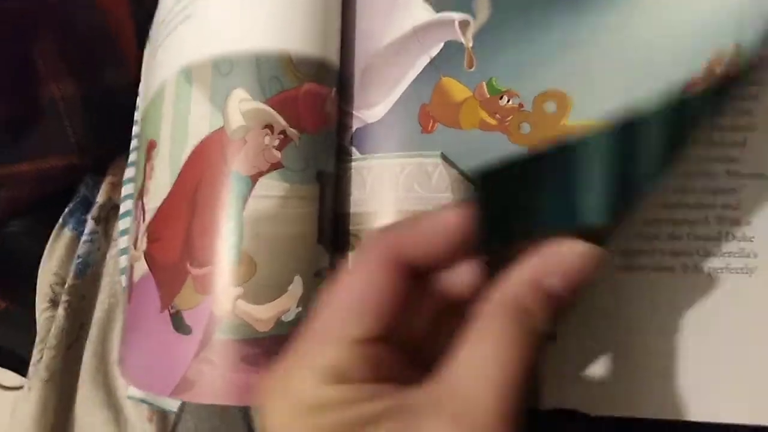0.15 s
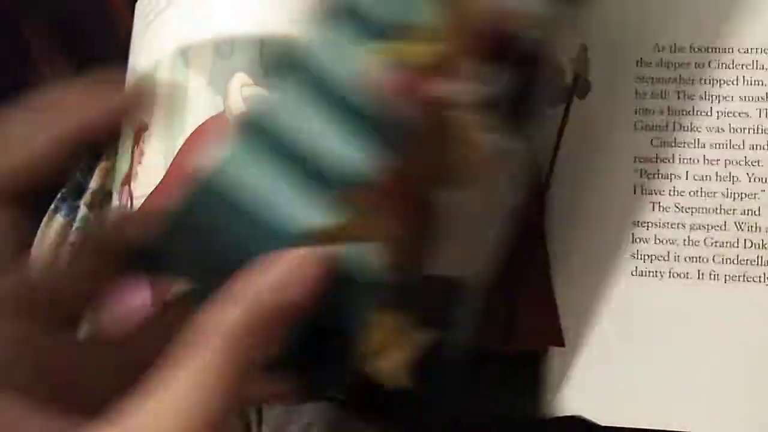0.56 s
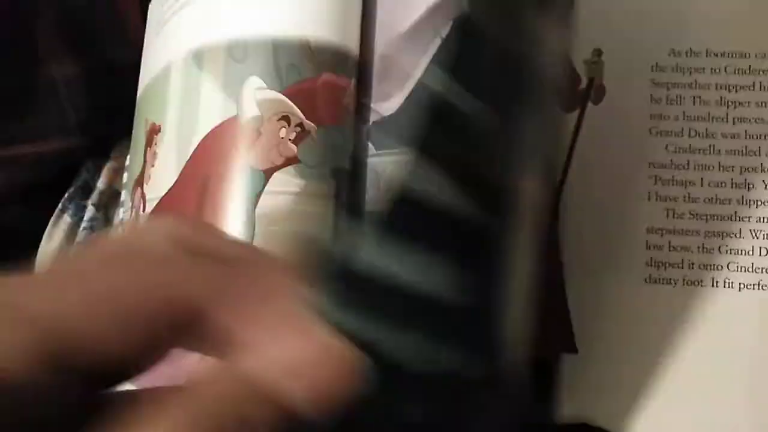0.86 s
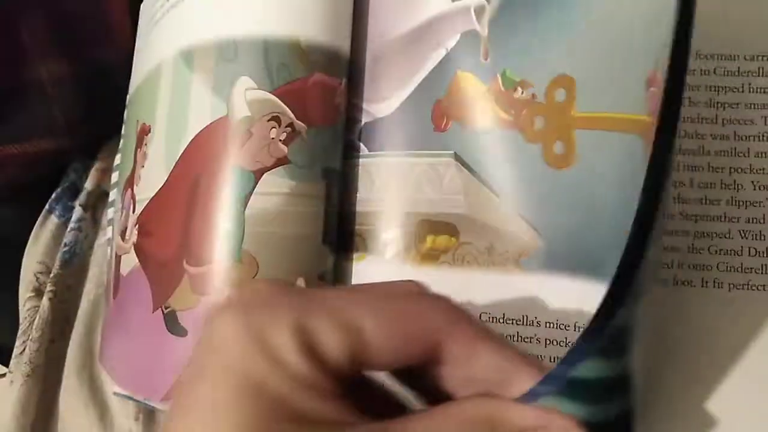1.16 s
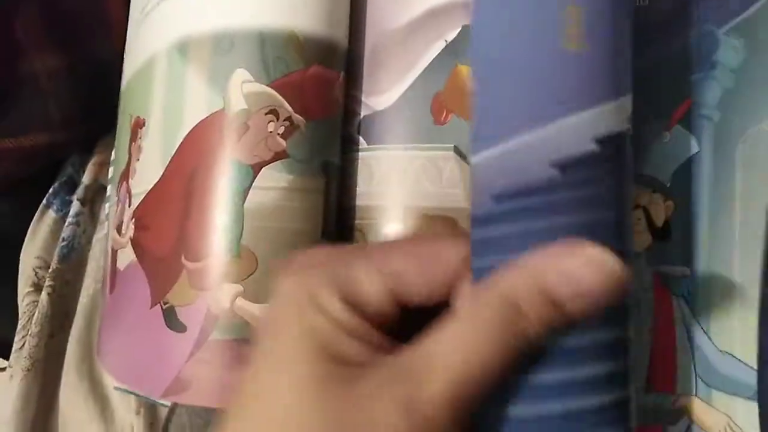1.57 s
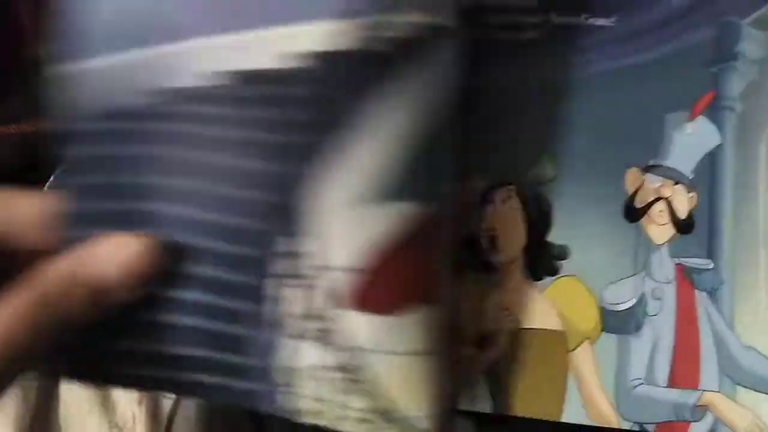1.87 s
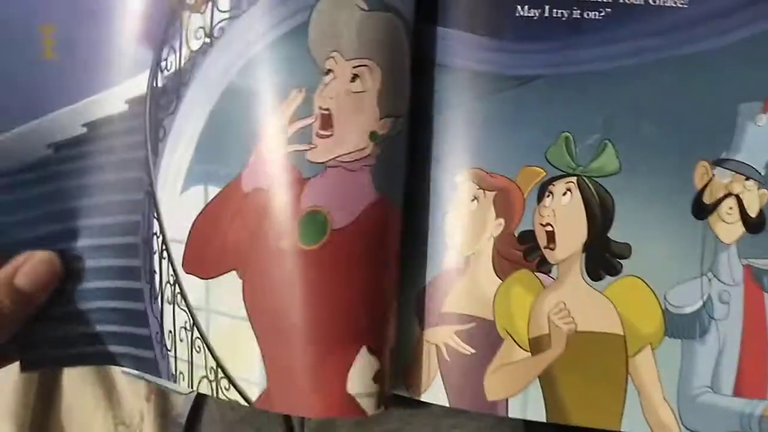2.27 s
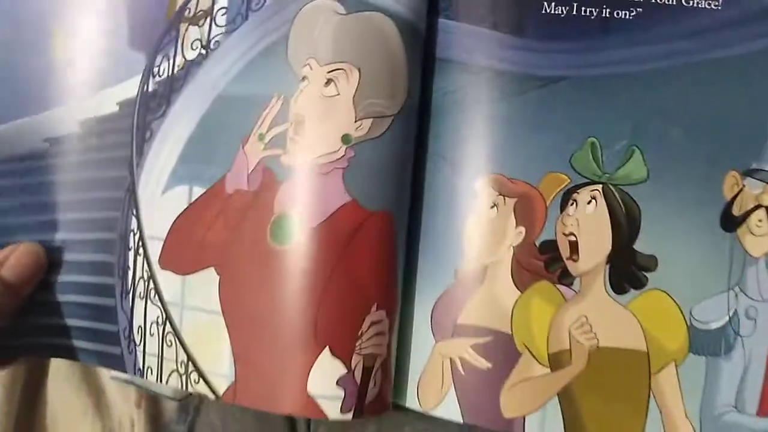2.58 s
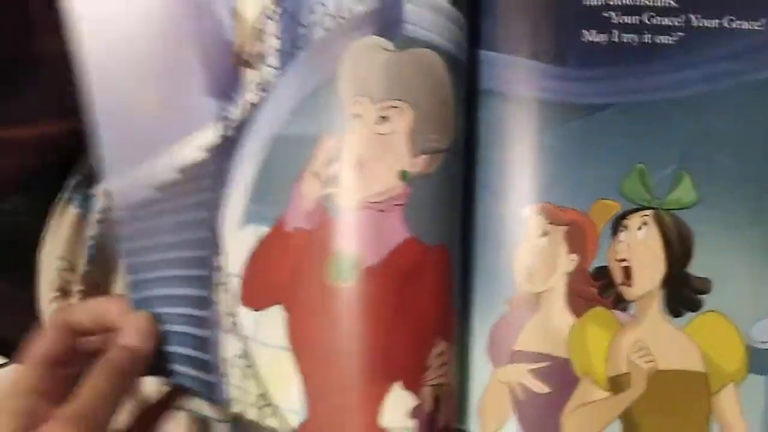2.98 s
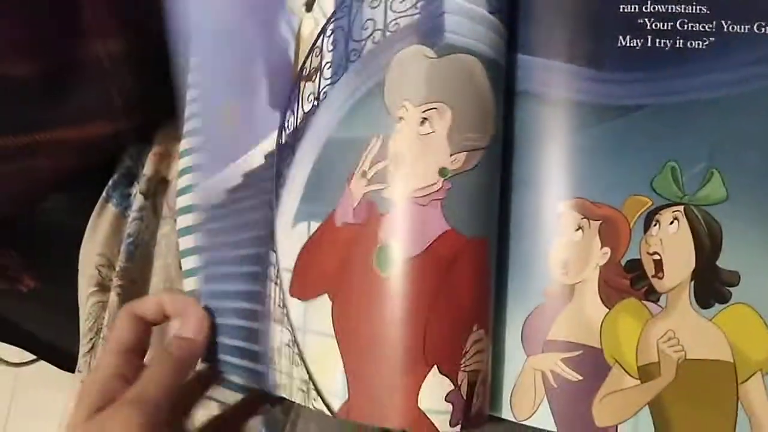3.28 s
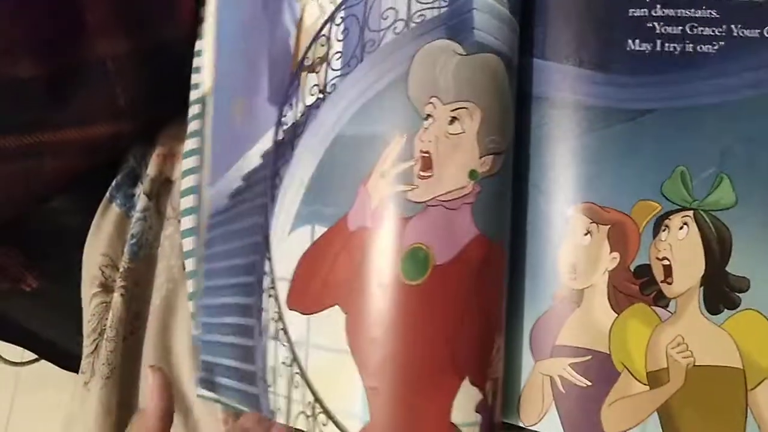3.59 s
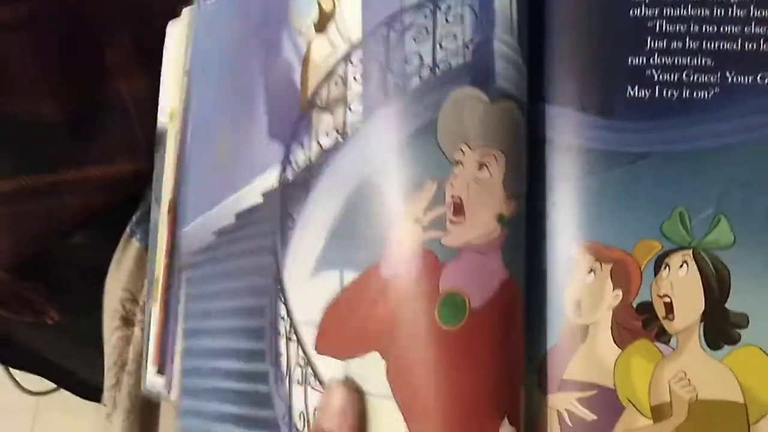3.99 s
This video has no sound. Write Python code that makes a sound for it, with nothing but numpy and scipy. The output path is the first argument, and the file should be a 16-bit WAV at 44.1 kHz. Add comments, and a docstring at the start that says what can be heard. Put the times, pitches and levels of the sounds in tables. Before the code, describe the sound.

Close, bright paper rustling as a hand turns slick book pages in a quiet room, with tiny crackles and low handling thumps.

```python
"""A bright hiss comes first: fingers stroke the glossy pages of a picture book, close to a phone in a quiet room.
Skin slides over the coating in tiny slips, with a scuff and the duller rustle of the sheet beneath the hiss.
The air pocket between the pages rings hollow, the bending page wobbles low and the paper snaps now and then.
Behind this the hand that holds the phone rumbles through its case, over a faint room.
All of it is shaped noise, heard by the phone's two microphone ports."""
import sys
import numpy as np
from scipy import signal
from scipy.fft import rfft, irfft
from scipy.io import wavfile
from scipy.ndimage import uniform_filter1d, map_coordinates

SR = 44100
rng = np.random.default_rng(int(sys.argv[2]) if len(sys.argv) > 2 else 0)


def int16_out(signal):
    """Quantize to a 16-bit WAV file."""
    q = np.round(np.clip(np.atleast_2d(signal).T, -1, 1) * 32767)
    wavfile.write(sys.argv[1], SR, q.astype(np.int16))


N = 181912
T = np.arange(N) / SR
CONTROL_T = T[::64]  # slower clock for the level curves

# Strokes of skin over the gloss: peak t/s, rise t/s, hold t/s, fall t/s, hiss level/dB,
# then over the hiss: sheet level/dB, top treble level/dB, hollow level/dB
STROKES = [ (0.0, .03, 0.0021, 0.2, -39.5, -9.5, -6, -10),
           (0.151, 0.37, 0.0049, 0.17, -48, -1.5, -11, -4.5), (.2, .06, 0.041, 0.16, -56.5, 4.5, -4, 3.7),
           (.331, 0.014, 0.038, 0.081, -41.5, -5, -13, -6.5),
           (0.366, 0.034, 0.011, 0.087, -25.5, -11, -7.5, -10.5),
           (0.46, 0.041, 0.047, 0.27, -38, -8, -4.5, -10), (0.586, 0.23, 0.15, 0.2, -48, -7, -6, -6),
           (0.748, 0.06, 0, 0.22, -33.5, -6, -4.5, -11), (0.904, 0.084, 0, 0.27, -42, -2, -6, -1.5),
           (0.956, 0.11, 0.0094, 0.047, -36.5, -14, -6.5, -9), (1.036, .15, 0.016, 0.036, -48, -0.5, -4, 0),
           (1.075, 0.062, 0.08, 0.018, -60.5, 5, -16, 8.5),
           (1.153, 0.047, 0.049, 0.16, -43.5, -11.5, -5, -9),
           (1.267, 0.086, 0.0078, 0.098, -38.5, -6.5, -5.5, -13),
           (1.395, 0.12, 0.0033, 0.23, -27.5, -5.5, -6, -12.5),
           (1.472, 0.074, 0.013, 0.13, -23.5, -8.5, -6, -14.5),
           (1.612, 0.1, 0.099, 0.39, -32, -10, -10, -8.5), (1.972, 0.21, 0, 0.065, -37.5, -11.5, -11, -5),
           (2.035, 0.16, 0.027, 0.049, -35, -11, -2.5, -5), (2.11, 0.036, 0.025, 0.18, -39, -2, -12, 0.5),
           (2.15, .11, 0.13, 0.12, -41.5, -7, -4, -32), (2.297, 0.049, 0.0051, 0.092, -35.5, -12, -11, -15),
           (2.36, 0.17, 0.13, 0.26, -48.5, -5, -18, -9.5), (2.488, 0.16, 0, 0.36, -37, -12, -4.5, -20),
           (2.63, 0.33, 0.094, .05, -55.5, 1, -13, -20), (2.702, 0.042, 0.025, 0.14, -42, -5.5, -6, -7),
           (2.79, 0.12, 0.065, 0.02, -52.5, -8, -3, -27), (2.908, 0.0078, 0.048, 0.046, -48.5, -8, 1, -19),
           (2.926, 0.019, .04, 0.051, -43, -8, -4.5, -23),
           (3.051, .007, 0.014, 0.068, -59.5, -8.5, -4, -26),
           (3.112, 0.0074, 0.0038, 0.13, -53, -20.5, -10, -21.5),
           (3.138, 0.066, 0.092, 0.021, -61, -33, -4, -24),
           (3.304, 0.033, .042, 0.032, -49.5, -9.5, -5.5, -19), (3.399, 0.12, 0, 0.12, -71, -7, -1.5, -5),
           (3.562, 0.059, 0.16, 0.046, -80.5, -31, 8, -12.5),
           (3.616, 0.11, 0.017, 0.062, -67.5, -43, 5, -38),
           (3.658, .025, 0.0028, 0.065, -58, -35.5, -6, -28),
           (3.735, .011, 0.044, 0.13, -48.5, -19, -10, -22), (3.785, 0.039, 0.052, 0.047, -44.5, -3, -8, 0),
           (3.859, 0.048, 0, 0.08, -35, -13, -6, -13.5), (3.91, 0.061, 0.025, 0.05, -57, -6, -12, 1),
           (4.02, 0.038, 0.048, 0.019, -57, -19, -9, -35), (4.056, .016, 0.034, 0.17, -42.5, -25, -16, -27)]
# Colours of the four rubbing layers, each: f/Hz, relative level/dB per Hz
HISS_COLOUR = [(3060, -38), (5200, -7), (6250, 1), (7360, -2.5), (8010, -4), (9040, -7.5), (10000, -11),
               (13000, -38.5), (22000, -120)]
SHEET_COLOUR = [(740, -48.5), (1250, -8), (1530, -6.5), (1960, 1), (2150, -6), (2490, -0.5), (3300, -13.5),
                (4290, -38.5), (7260, -120)]
TOP_COLOUR = [(5000, -42.5), (8500, 1.5), (9220, 3), (12300, -4), (14300, -15), (14800, -26.5)]
SCUFF_COLOUR = [(1820, -42), (3100, -2), (3420, -4.5), (3880, -1.5), (4630, -1.5), (5600, -4.5),
                (7280, -32.5), (12300, -120)]
# Scuff over the hiss as the grip changes, before the sheet's share: t/s, level/dB
SCUFF_LEVEL = [(0, 0), (.34, 1), (.45, -1), (.85, -2.5), (1.15, 2.5), (1.22, -3), (1.45, -1), (1.6, 0),
               (1.95, -5.5), (2.15, 1), (2.4, -2.5), (2.7, -1.5), (3.05, -2), (3.15, 2), (3.35, -3.5),
               (3.75, 2), (3.87, -0.5), (4.12, 2)]
# Sound that both microphone ports hear alike: f/Hz, share of power
HEARD_ALIKE = [(60, 0.83), (300, 0.23), (1000, 0.58), (3000, 0.51), (7000, 0.21), (14000, 0.15)]
# The hand moves across the phone: t/s, delay of the left port/ms, left-right level/dB
HAND = [(0, 0.041, 5), (.3, 0.11, 5), (.6, 0.25, 2), (1.0, 0.25, 3.5), (1.2, 0.045, 5.5), (1.5, 0.064, 3.5),
        (1.7, 0.1, 2), (1.9, 0.25, 1), (2.098, 0.29, 1.8), (2.32, 0.3, 1), (2.451, 0.27, 1),
        (2.95, 0.32, -1), (3.1, 0.28, -2.5), (3.35, .29, 1), (3.58, 0.16, -9), (3.7, 0.03, 0.5),
        (4.12, 0.14, 2)]
# share of the fall that each layer follows
SHEET_FOLLOWS, SCUFF_FOLLOWS, TOP_FOLLOWS, HOLLOW_FOLLOWS = 0.92, 0.9, 1, 0.65
SCUFF_WITH_SHEET = 0.54  # share of the sheet's dB that the scuff takes on


def sliding(patchy_db=1.3, flicker_db=1.2, side_db=1.5):
    """Slips excite coating and sheet; the contact patch keeps changing, so the colour drifts."""
    frames = dict(nperseg=256, noverlap=192)
    hz, t, (common, own_left, own_right) = signal.stft(ringing(slips(), 4.35), SR, **frames)
    *shape, hiss_db, sheet_db, top_db, _ = columns(STROKES)
    scuff_db = np.interp(t, *np.transpose(SCUFF_LEVEL)) + SCUFF_WITH_SHEET * sheet_db
    layers = [(HISS_COLOUR, 0, 1), (SHEET_COLOUR, sheet_db, SHEET_FOLLOWS),
              (TOP_COLOUR, top_db, TOP_FOLLOWS), (SCUFF_COLOUR, scuff_db, SCUFF_FOLLOWS)]
    power = 0
    for colour, over_hiss_db, follows in layers:
        spectrum = evened(gain_of(read(colour, hz)))
        level = summed(hiss_db + over_hiss_db + swells(t, *shape, follows))
        power = power + np.outer(spectrum, level) ** 2
    patches = patchy_db * drifting(power.shape, 2, 23)
    flicker = flicker_db * drifting((1, len(t)), 1, 3.2)
    # each port also hears its own reflections off the hand and the page
    alike = np.clip(read(HEARD_ALIKE, hz), 0, 1)[:, None]
    left = np.sqrt(alike) * common + np.sqrt(1 - alike) * own_left
    right = np.sqrt(alike) * common + np.sqrt(1 - alike) * own_right
    s, _, pan_db = np.transpose(HAND)
    lean_db = np.interp(t, s, pan_db) + side_db * drifting(power.shape, 6.5, 40)
    ports = np.array([left * gain_of(lean_db / 2), right / gain_of(lean_db / 2)])
    ports = ports * np.sqrt(power) * gain_of(patches + flicker)
    return signal.istft(ports, SR, **frames)[1][:, :N]


def slips(per_s=1500, spread_db=-1.5, share=0.21):
    """The force of skin on gloss: dense noise with sharper slips of uneven size."""
    happens = rng.random(N) < per_s / SR
    sizes = gain_of(spread_db * np.minimum(rng.exponential(1, N), 3.2)) * happens
    grains = signal.lfilter([1], [1, -.85], sizes)  # each slip dies away within samples
    force = 1 - share + share * evened(grains)
    return force * rng.standard_normal((3, N))


# The pocket closes and rings purer once the page lies down: t/s, pitch f/Hz,
# width f/Hz (sets the blend of the open and the shut resonance)
POCKET = [(0, 940, 724), (.15, 1100, 766), (.3, 870, 696), (.37, 1215, 757), (.57, 960, 690),
          (.74, 1150, 756), (.82, 970, 770), (1.2, 1110, 775), (1.29, 1260, 735), (1.55, 1120, 685),
          (2.35, 1107, 724), (2.66, 1215, 574), (2.8, 1133, 523), (3.15, 1116, 430), (3.28, 706, 420),
          (3.42, 906, 401), (3.75, 926, 376), (4.02, 1020, 380), (4.06, 1220, 380)]


def hollow(open_hz=800, shut_hz=330):
    """The air pocket between the pages rings under each stroke; a wide and a narrow resonance blend."""
    *shape, hiss_db, _, _, hollow_db = columns(STROKES)
    level = summed(hiss_db + hollow_db + swells(CONTROL_T, *shape, HOLLOW_FOLLOWS))
    s, pitch_hz, width_hz = np.transpose(POCKET)
    air = ringing(pair(0.34), 4.5)
    pitch = np.interp(T, s, pitch_hz)
    shut = np.clip((open_hz - np.interp(T, s, width_hz)) / (open_hz - shut_hz), 0, 1)
    narrow = np.sqrt(shut) * resonate(air, pitch, shut_hz)
    wide = (1 - np.sqrt(shut)) * resonate(air, pitch, open_hz)
    return (narrow + wide) * np.interp(T, CONTROL_T, level)


# The page wobbles as it bends: peak t/s, rise t/s, hold t/s, fall t/s, level/dB, pitch f/Hz
WOBBLES = [(.034, 0.13, 0.032, 0.081, -60.5, 552), (.17, 0.25, 0.0031, 0.058, -65, 436),
           (.352, 0.049, 0.031, .075, -77, 478), (.758, 0.015, 0, 0.0077, -41, 440),
           (.9, .03, 0, 0.025, -62, 514), (.926, 0.024, 0.021, .11, -53.5, 305),
           (1.0, 0.037, 0.092, .14, -63, 508), (1.28, 0.079, 0.19, 0.046, -60, 550),
           (1.494, 0.021, 0.0053, 0.095, -51, 300), (1.882, .03, 0, .12, -78, 503),
           (2.01, 0.017, 0.086, .05, -51.5, 315), (2.04, .02, 0, .03, -56.5, 520),
           (2.116, .012, 0.01, .05, -45.5, 285), (2.15, 0.035, 0.01, 0.056, -53, 380),
           (2.19, .11, 0.097, .055, -63.5, 320), (2.628, .021, 0.0085, 0.011, -61, 312),
           (2.69, 0.0095, 0.012, 0.091, -52, 340), (2.79, 0.076, 0.054, .055, -78, 310),
           (2.986, 0.11, 0, .025, -74.5, 486), (3.112, .013, 0.031, 0.044, -76, 479),
           (3.216, .025, 0.063, .03, -80, 500), (3.8, 0.055, 0.047, .11, -58.5, 403)]


def bending(width_hz=160):
    """The page wobbles as it bends; the pitch is a mean that leans to the loudest wobble."""
    *shape, db, hz = columns(WOBBLES)
    power = gain_of(db + swells(CONTROL_T, *shape)) ** 2
    total = power.sum(0)
    pitch = np.interp(T, CONTROL_T, (power * hz).sum(0) / total)
    wobble = resonate(ringing(pair(0.17), 3.9), pitch, width_hz)
    return wobble * np.interp(T, CONTROL_T, np.sqrt(total))


# Snaps of the paper: onset t/s, level/dB, ring over the bright part level/dB, ring f/Hz,
# rise t/ms, 60 dB decay t/ms, left-right level/dB
SNAPS = [(1.0408, -44, -5, 1780, 0.079, 7.4, 16), (1.0797, -29, -23, 2410, 0.05, 6.6, 7.5),
         (1.0985, -44.5, -5, 2570, 0.082, 9.6, 26), (1.1112, -27, -6, 2770, 0.12, 10.5, 5),
         (1.1352, -29, -20, 1470, 0.11, 13, 3), (1.4638, -23, 6.5, 7300, 5.7, 7, 8),
         (2.1105, -42, 15, 1730, 0.79, 5.7, -1), (2.6897, -50.5, 14, 1229, 0.15, 9.1, -19),
         (2.6945, -46, 15.5, 2600, 0.84, 23, -1), (2.6955, -56, 8.5, 1480, 1.5, 23, -29),
         (3.181, -68, -14, 2500, 1.2, 20, 0), (3.2195, -72, -27, 2530, 1.3, 12, 3.5),
         (3.3445, -65, -12, 2200, .3, 18, -2), (4.0062, -49.5, 4, 6700, 0.074, 15, -3),
         (4.009, -68.5, 1, 6300, 2.7, 73, -23)]
# Colour of a snap's bright part: f/Hz, relative level/dB per Hz
CRACK_COLOUR = [(410, -35.5), (700, -6), (5130, -2), (5970, -6.5), (6950, -4.5), (7990, -8), (10000, -4.5),
                (13600, -17.5), (14500, -24.5)]


def snaps(tail_db=-24, tail_ms=70, echo_db=-7, echo_ms=2.3, tick_db=13, breadth=0.87):
    """A fold gives way: a burst rings coating and sheet, swells again off a near surface, dies in the room."""
    size = 8192  # samples per snap
    out, t = np.zeros((2, N + size)), np.arange(size) / SR * 1000
    for s, db, ring_db, hz, rise_ms, t60_ms, pan_db in SNAPS:
        rise = np.sin(np.pi / 2 * np.clip(t / max(rise_ms, .05), 0, 1)) ** 2
        after = np.maximum(t - rise_ms, 0)
        direct = rise * gain_of(-60 * after / max(t60_ms, 1))
        echo = gain_of(echo_db) * np.interp(t - echo_ms, t, direct)  # repeats the envelope
        tail = rise * gain_of(tail_db - 60 * after / tail_ms)
        shape = direct + echo + tail
        # one sharp tick near the start, weaker when the snap rises slowly
        tick = gain_of(tick_db - 10 * rise_ms) * (np.arange(size) == 8)
        burst = pair(0.42, size) + tick
        bright = coloured(burst, CRACK_COLOUR)
        sound = (bright + gain_of(ring_db) * resonate(burst, hz, breadth * hz)) * shape
        # hold the bright part to the energy of the envelope
        sound = sound * np.sqrt(2) * np.linalg.norm(shape) / np.linalg.norm(bright * shape)
        at = round(s * SR)
        out[:, at:at + size] += sound * gain_of(db + np.array([[pan_db], [-pan_db]]) / 2)
    return out[:, :N]


# The hand that holds the phone shifts its grip: peak t/s, hold t/s, fall t/s, rumble level/dB
JOLTS = [(.04, 0.01, 0.092, -57.5), (0.144, .03, 0.085, -54.5), (.26, 0.0056, .065, -63),
         (0.371, 0.0082, .045, -52), (.45, 0.033, .15, -63), (0.758, 0.069, 0.42, -53),
         (1.11, 0.03, .19, -60), (1.287, 0.31, 0.069, -61), (1.79, 0, .4, -66), (2.15, 0.022, .21, -52),
         (2.31, 0.0096, 0.14, -61), (2.84, 0, .06, -56.5), (2.92, 0, 0.0083, -62), (2.97, 0, 0.039, -65),
         (3.081, 0.013, .06, -70), (4.08, 0.012, 0.039, -65)]
# Colour of the handling rumble: f/Hz, relative level/dB per Hz
RUMBLE_COLOUR = [(15, -64.5), (36, -21.5), (55, 5), (78, 4.5), (100, -1.5), (190, -13), (260, -40),
                 (480, -120)]
JOLT_RISE_S, GRIP_DB, TREMOR_DB = 0.057, -73.5, 1  # a steady, trembling grip lies under the jolts


def holding():
    """The holding hand rumbles through the case, almost alike in both ports."""
    peak, hold, fall, db = columns(JOLTS)
    grip = gain_of(GRIP_DB + TREMOR_DB * drifting((1, len(CONTROL_T)), 1, 25)[0])
    jolts = summed(db + swells(CONTROL_T, peak, JOLT_RISE_S, hold, fall))
    level = np.hypot(jolts, grip)
    return coloured(pair(0.97), RUMBLE_COLOUR) * np.interp(T, CONTROL_T, level)


# Colour of the quiet room: f/Hz, relative level/dB per Hz
ROOM_COLOUR = [(59, -27.5), (100, -9), (241, -17), (977, -21.5), (3720, -50.5), (6410, -21), (9740, -21.5),
               (12800, -30.5), (13900, -27.5), (14800, -43)]
ROOM_DB = -77.5


def quiet_room():
    """The room: steady coloured noise, mostly different in the two ports."""
    return gain_of(ROOM_DB) * coloured(pair(0.17), ROOM_COLOUR)


def gain_of(db):
    """Decibels to a factor."""
    return 10 ** (np.asarray(db) / 20)


def evened(x):
    """Scales to rms 1."""
    return x / np.sqrt(np.mean(abs(x) ** 2) + 1e-20)


def columns(table):
    """The columns of a table, each upright to spread over time."""
    return np.transpose(table)[:, :, None]


def read(points, hz):
    """Straight lines on a log-frequency axis."""
    f, value = np.transpose(points)
    return np.interp(np.log(hz + 1), np.log(f + 1), value)


def coloured(x, spectrum):
    """Gives white x a spectrum and about keeps its rms."""
    shape = gain_of(read(spectrum, np.fft.rfftfreq(x.shape[-1], 1 / SR)))
    return irfft(rfft(x) * evened(shape), x.shape[-1])


def pair(alike, size=N):
    """Two white noises with the correlation alike."""
    a, b = rng.standard_normal((2, size))
    alike = np.clip(alike, 0, 1)
    return np.array([a, alike * a + np.sqrt(1 - alike ** 2) * b])


def drifting(shape, across, along):
    """Smooth chance over frequency (across) and time (along), rms 1."""
    field = rng.standard_normal(shape)
    for _ in range(2):
        field = uniform_filter1d(field, max(int(across), 1), -2)
        field = uniform_filter1d(field, max(int(along), 1), -1)
    return evened(field)


def resonate(x, hz, width_hz):
    """A steep-sided resonance that follows the curve hz, at rms 1."""
    turn = np.exp(2j * np.pi * np.cumsum(hz * np.ones(x.shape[-1])) / SR)
    smooth = signal.butter(3, width_hz / 2, fs=SR, output="sos")
    # shift the pitch down to 0 Hz, low-pass, shift back
    return evened((turn * signal.sosfilt(smooth, x / turn)).real)


def ringing(x, depth_db):
    """The many narrow modes of the sheet, which shift as it bends; rms 1."""
    z = signal.stft(x, nperseg=1024, noverlap=768)[2]
    z = z * gain_of(depth_db * drifting(z.shape[-2:], 1.6, 8.3))
    return evened(signal.istft(z, nperseg=1024, noverlap=768)[1][:, :N])


# a swell gains SWELL_DB over its rise and loses it over its fall; an exponent above 1 rounds the top
SWELL_DB, ROUND_RISE, ROUND_FALL = 25.5, 1.15, 0.83


def swells(t, peak, rise, hold, fall, follows=1):
    """Rise, hold and fall of every row, in dB under its top: rows x times."""
    peak, rise, hold, fall = [np.reshape(v, (-1, 1)) for v in (peak, rise, hold, fall)]
    late = t - peak
    before = np.clip(-late / rise, 0, 9)
    after = np.clip((late - hold) / fall, 0, 9)
    return -SWELL_DB * (before ** ROUND_RISE + follows * after ** ROUND_FALL)


def summed(db):
    """Adds rows of levels as powers; returns a factor."""
    return np.sqrt((gain_of(db) ** 2).sum(0))


def delayed(x):
    """Delays the left port by a time that varies as the hand moves."""
    s, delay_ms, _ = np.transpose(HAND)
    late = np.arange(N) - np.interp(T, s, delay_ms) * SR / 1000
    return np.array([map_coordinates(x[0], [late], order=3), x[1]])


def scene():
    """Everything that reaches the phone: the close hands and paper, then the room behind."""
    close = sliding() + hollow() + bending() + snaps() + holding()
    return delayed(close) + quiet_room()


# Difference between the two microphone ports: f/Hz, left-right level/dB
PORTS = [(60, 1), (110, 0), (200, -6.5), (370, 2), (690, 3), (1260, -2.5), (2320, -4), (4270, 0.5),
         (7860, 5), (14400, -16.5)]
EDGE_HZ = 14450  # upper band limit


def record(dry):
    """The two ports colour the sound differently; bass cut, soft overload, then the band limit."""
    half = gain_of(read(PORTS, np.fft.rfftfreq(N, 1 / SR)) / 2)
    ported = irfft(rfft(dry) * np.array([half, 1 / half]), N)
    thin = signal.sosfilt(signal.butter(3, 38, "high", fs=SR, output="sos"), ported)
    # straight up to half of full scale, bent above
    over = .5 + .32 * np.tanh((abs(thin) - .5) / .32)
    bent = np.where(abs(thin) < .5, thin, np.sign(thin) * over)
    band = signal.firwin(255, EDGE_HZ, window=("kaiser", 9), fs=SR)
    return signal.oaconvolve(bent, band[None], "same")


dry = scene()
out = record(dry)
int16_out(out)
```